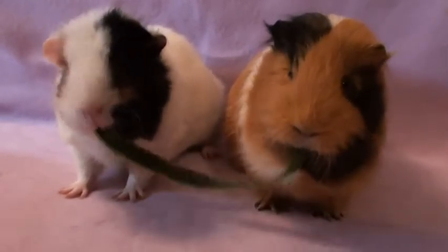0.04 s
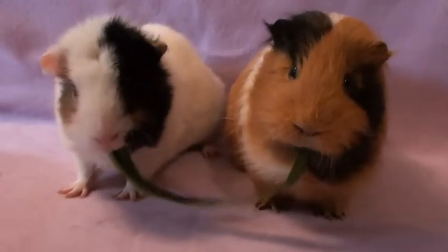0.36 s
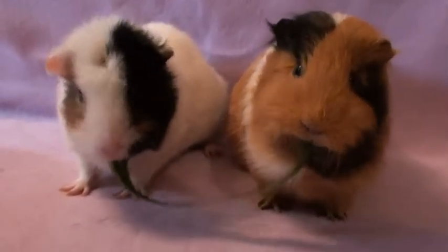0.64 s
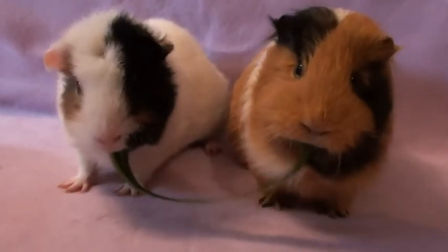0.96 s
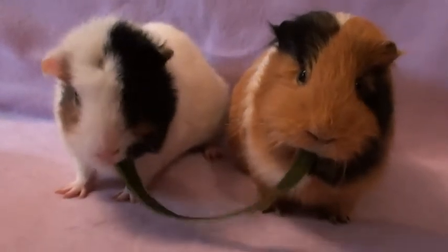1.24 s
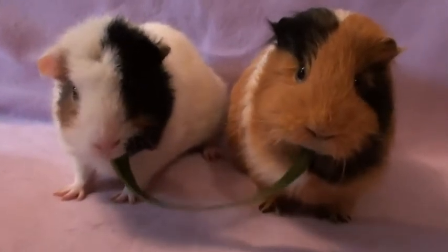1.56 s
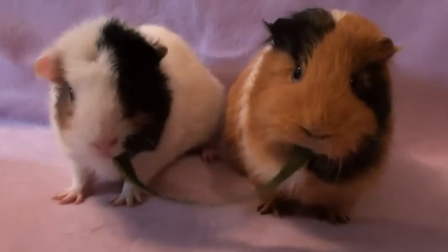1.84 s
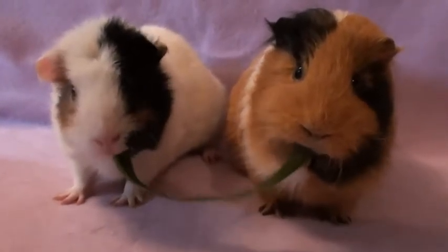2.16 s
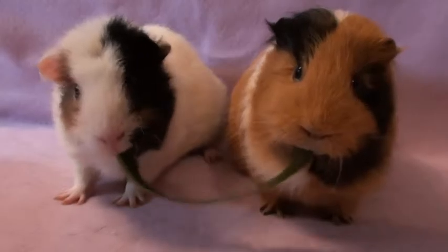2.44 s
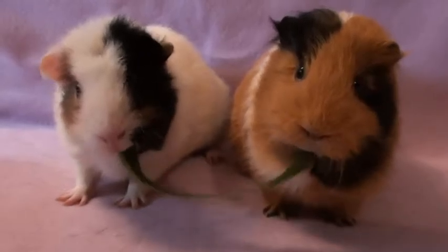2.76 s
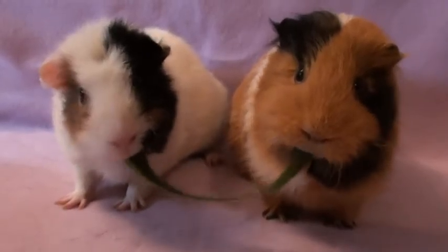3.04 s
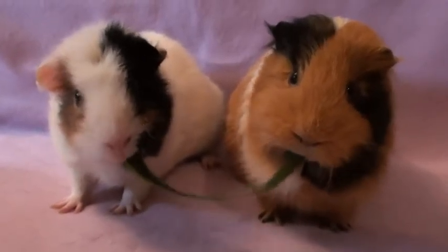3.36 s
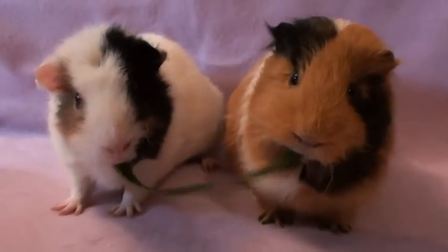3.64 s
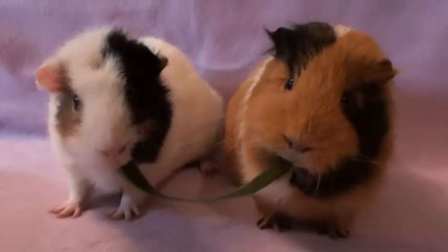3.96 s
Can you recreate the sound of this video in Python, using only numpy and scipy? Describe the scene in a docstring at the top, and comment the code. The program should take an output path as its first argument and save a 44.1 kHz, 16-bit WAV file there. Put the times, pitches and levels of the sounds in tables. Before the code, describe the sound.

Crisp, quick munching of guinea pigs eating a strip of peel, over soft room hiss.

```python
"""Two guinea pigs chew the ends of one strip of peel, close to the microphone in a quiet room.
Soft room noise and hiss lie underneath from the start. Teeth click, then a jaw closes about six
times a second: plant fibres burst in a short crackle of tiny snaps, and the molars slide over the
pulp and ring the mouth. Now and then a jaw thumps softly. Near the end the teeth click twice more."""
import sys
import numpy as np
from scipy import signal
from scipy.fft import rfft, irfft
from scipy.io import wavfile

SR = 44100
rng = np.random.default_rng(int(sys.argv[2]) if len(sys.argv) > 2 else 0)


def pcm_store(signal):
    """Save signal as 16-bit PCM."""
    levels = np.round(np.clip(np.atleast_2d(signal), -1, 1) * 32767)
    wavfile.write(sys.argv[1], SR, levels.astype(np.int16).T)


N = 176400

# steady room noise and hiss: frequency_hz, gain_db
ROOM_TONE = [(22, -50), (38, -15), (80, -0.5), (140, -1), (290, 3.5), (450, 0), (700, -2), (1300, -3.5),
             (2200, -6), (4000, -5), (7000, -8), (11000, -10), (16000, -12)]
# its side level against the middle: frequency_hz, gain_db
ROOM_TONE_SIDE = [(25, -17), (50, -20), (110, -11), (200, -8.5), (380, -3), (700, 1), (1300, 0),
                  (2400, -2.5), (4400, -9), (8000, -7.5), (13000, -31)]
# teeth that click together: start_s, peak_db
TOOTH_CLICKS = [(.002, -36.5), (0.2834, -38), (3.413, -41), (3.4244, -28.5)]
# modes of the teeth: pitch_hz, level_db, t60_s
TOOTH_MODES = [(2693, -2.5, 0.017), (3220, -13, 0.01), (3800, -5.5, 0.013), (4120, -2, 0.0078),
               (5330, 0, 0.011)]
# bites, each a burst of breaking fibres: centre_s, half_length_s, level_db, pitch_hz
BITES = [(0.012, 0.025, -49.5, 9200), (0.048, 0.036, -42, 10000), (0.182, 0.099, -61, 9540),
         (0.306, 0.07, -57.5, 9100), (0.387, 0.056, -47.5, 10300), (0.477, 0.026, -53, 9500),
         (0.551, 0.039, -42.5, 9900), (0.654, 0.064, -54, 9700), (0.728, 0.036, -48, 9300),
         (0.761, 0.032, -45.5, 9700), (0.894, 0.041, -46, 10000), (0.968, 0.076, -60.5, 9500),
         (1.064, 0.051, -46, 10040), (1.135, 0.038, -56.5, 8750), (1.254, 0.027, -42.5, 9500),
         (1.279, 0.016, -47, 8950), (1.413, 0.025, -54, 8300), (1.463, 0.049, -52, 8500),
         (1.583, 0.037, -45.5, 9000), (1.767, 0.039, -46, 9800), (1.902, 0.035, -43, 9350),
         (2.078, 0.042, -47, 11200), (2.104, 0.015, -43.5, 9200), (2.237, 0.04, -47, 9800),
         (2.401, 0.029, -51, 9900), (2.426, 0.024, -46, 10400), (2.559, 0.03, -51.5, 10900),
         (2.596, 0.029, -46, 9800), (2.716, 0.05, -53, 9800), (2.775, 0.05, -51, 9500),
         (2.871, 0.059, -56.5, 9900), (2.93, 0.032, -41, 9600), (3.02, 0.075, -59.5, 9050),
         (3.1, 0.03, -53.5, 9600), (3.14, 0.02, -51.5, 8000), (3.219, 0.029, -55.5, 10600),
         (3.267, 0.017, -44.5, 9400), (3.29, 0.016, -50, 10100), (3.365, 0.04, -57, 9900),
         (3.435, 0.056, -50.5, 10300), (3.585, 0.035, -39.5, 9900), (3.745, 0.12, -54.5, 9600),
         (3.81, 0.019, -50.5, 10200), (3.939, 0.026, -40, 10300)]
# single tough fibres that snap: start_s, level_db, pitch_hz
TOUGH_FIBRES = [(.007, -22.5, 9100), (0.014, -25, 8950), (0.0462, -21.5, 8700), (.198, -30.5, 13000),
                (.3415, -24.5, 8300), (0.385, -31, 9000), (0.5411, -22.5, 7940), (0.558, -29, 9400),
                (0.638, -33, 9300), (.697, -34, 7700), (.712, -27, 10000), (0.755, -24.5, 9500),
                (0.883, -29, 8850), (1.0725, -27, 10100), (1.1479, -21, 8400), (1.1529, -27, 8250),
                (1.245, -21.5, 9900), (1.2585, -24, 9500), (1.3905, -27, 8950), (1.569, -22, 10100),
                (1.581, -23, 9500), (1.7625, -21.5, 11400), (1.895, -21, 9300), (2.109, -40, 9600),
                (2.2423, -24.5, 8900), (2.393, -24.5, 9300), (2.531, -23.5, 9800), (2.591, -20, 11000),
                (2.756, -22.5, 9600), (2.777, -27.5, 10100), (2.923, -33, 9900), (2.9298, -18, 10700),
                (3.088, -34, 10000), (3.1858, -36.5, 5100), (3.257, -25, 10800), (3.2882, -22.5, 9400),
                (3.5723, -22, 9500), (3.586, -22, 10400), (3.595, -17, 10500), (3.85, -29, 9800),
                (3.933, -24, 9600)]
# colour that the mouth gives to every snap: frequency_hz, gain_db
SNAP_COLOUR = [(200, 7.5), (2000, 7.5), (4000, 6), (6500, 4), (8000, -2.5), (9700, 0.5), (11200, 1),
               (13200, -4), (16000, -2.5)]
# close reflections from the peel and the ground: delay_s, gain_db
REFLECTIONS = [(.00043, -22), (.0011, -18)]
# soft, low thumps of the jaw: start_s, level_db, pitch_hz
JAW_THUMPS = [(.012, -50.5, 514), (0.075, -49.5, 445), (.61, -56, 620), (2.263, -54, 315),
              (2.416, -52, 295), (3.253, -49, 257), (3.283, -49.5, 256), (3.817, -52.5, 269)]
# grinding strokes of the molars: centre_s, jaw_db, mouth_db, rasp_db
MOLAR_STROKES = [(0.018, -59, -64, -54.5), (0.162, -62.5, -60.5, -54), (0.318, -62, -59.5, -65),
                 (0.371, -71, -67, -56), (0.446, -66, -65, -61), (0.492, -66, -57.5, -63),
                 (0.56, -65, -66, -59.5), (0.76, -80, -73, -66), (0.823, -58.5, -55.5, -56),
                 (0.902, -62, -68, -57.5), (0.968, -60.5, -57, -56.5), (1.087, -60.5, -63.5, -67),
                 (1.275, -65.5, -66, -63), (1.335, -71, -73, -58), (1.412, -68, -79, -58.5),
                 (1.437, -77, -62, -60.5), (1.471, -64.5, -56.5, -56), (1.571, -71, -62, -61),
                 (1.623, -61.5, -60, -59.5), (1.754, -68, -63, -59), (1.799, -62, -56.5, -56.5),
                 (1.9, -75, -70, -67), (1.948, -63.5, -59.5, -62), (2.062, -82, -68, -55),
                 (2.104, -60.5, -59, -55), (2.264, -64, -64, -60), (2.418, -59.5, -59.5, -53.5),
                 (2.557, -66, -61, -62), (2.692, -67, -72, -61.5), (2.725, -59.5, -54.5, -55.5),
                 (2.775, -77, -68, -58), (2.887, -60.5, -65.5, -59), (3.046, -60, -60, -58.5),
                 (3.105, -88, -70, -55.5), (3.227, -58.5, -60.5, -58.5), (3.275, -80, -70, -59.5),
                 (3.375, -61, -57, -57), (3.445, -60.5, -64, -57), (3.591, -61, -64, -52),
                 (3.736, -60, -59.5, -53.5), (3.799, -68, -68, -57.5), (3.89, -61.5, -66, -58.5),
                 (3.99, -68, -64.5, -64)]
# thud of the jaw in a stroke: frequency_hz, gain_db
JAW_THUD = [(40, -35.5), (130, -22), (220, -6), (298, 2.5), (370, -5), (470, -0.5), (640, -28), (1000, -18),
            (2500, -57.5)]
# ring of the mouth in a stroke: frequency_hz, gain_db
MOUTH_RING = [(300, -21), (700, -15), (1000, -9), (1150, -2.5), (1280, 0.5), (1460, -9.5), (1850, -11),
              (2500, -34), (6000, -18)]
# rasp of the molars in a stroke: frequency_hz, gain_db
MOLAR_RASP = [(800, -25), (2100, -7), (3100, 6), (4400, 7), (5400, 3), (7500, -7.5), (10000, -3.5),
              (16000, -26)]
# the room's answer to the chewing: frequency_hz, gain_db
REVERB_COLOUR = [(30, -45), (120, -19), (350, -12.5), (700, -10), (1300, -29), (2500, -8), (5000, -17),
                 (9000, -24), (16000, -32)]

SNAP_RISE_S, TOP_HZ = .00014, 15900
FIBRE_SPREAD = dict(pitch_spread=.115, spread_db=3.6)
CELL_SPREAD = dict(pitch_spread=.25, spread_db=4)


def undb(db):
    """Decibels to gain."""
    return 10 ** (np.asarray(db) / 20)


def unit(x):
    """Scale to rms 1."""
    return x / np.sqrt(np.mean(x ** 2) + 1e-20)


def colour(x, points):
    """Causal filter whose gain follows (frequency_hz, gain_db) points."""
    hz, db = np.array(points, float).T
    n = 2 * N
    bin_hz = np.arange(N + 1) * SR / n
    gain_db = np.interp(np.log(bin_hz + 1), np.log(hz), db)
    cepstrum = irfft(np.log(undb(gain_db)))
    cepstrum[1:N] *= 2  # fold to minimum phase
    cepstrum[N + 1:] = 0
    return irfft(rfft(x, n) * np.exp(rfft(cepstrum)))[..., :x.shape[-1]]


def add(out, start_s, sound):
    """Mix a sound in at a time."""
    i = int(start_s * SR)
    sound, i = sound[max(0, -i):], max(0, i)
    out[i:i + len(sound)] += sound[:max(0, N - i)]


def ring(t, hz, rise_s, phase=0):
    """A few cycles that swell and die at once."""
    envelope = np.square(t / rise_s * np.exp(1 - t / rise_s))
    return envelope * np.sin(2 * np.pi * (np.minimum(hz, TOP_HZ) * t + phase))


def flutter(hz, depth_db, size=N):
    """A gain that wavers quickly at random."""
    steps = rng.standard_normal(N // 100)
    return undb(depth_db * np.interp(np.arange(size) / SR * hz, np.arange(len(steps)), steps))


def room_tone(mid_db=-57.5):
    """Steady room noise and hiss; the middle range is widest between left and right."""
    mid, side = (unit(colour(rng.standard_normal(N), ROOM_TONE)) for _ in range(2))
    return undb(mid_db) * (mid + colour(side, ROOM_TONE_SIDE) * np.array([[1], [-1]]))


def tooth_clicks():
    """Teeth meet and ring for a moment."""
    t, out = np.arange(SR // 20) / SR, np.zeros(N)
    click = sum(undb(db) * np.sin(2 * np.pi * (hz * t + rng.random())) * np.exp(-np.log(1000) * t / t60)
                for hz, db, t60 in TOOTH_MODES)
    for start_s, peak_db in TOOTH_CLICKS:
        add(out, start_s, undb(peak_db) * click / np.abs(click).max())
    return out


def crackle(length_s, per_s, hz, pitch_spread, spread_db, max_snaps=600):
    """Fibres or cells give way one after another, each with its own strength and pitch."""
    slot = np.arange(min(max_snaps, int(length_s * per_s)))[:, None]
    late, phase, chance = rng.random((3, max_snaps))[:, slot]
    strength = undb(spread_db * np.sqrt(12) * (chance - .5))  # bounded: none is far above the rest
    detune = np.clip(rng.standard_normal(max_snaps), -2, 2)[slot]
    samples = np.arange(56)
    snaps = strength * ring(samples / SR, hz * np.exp(pitch_spread * detune), SNAP_RISE_S, phase)
    onsets = ((slot + late) / per_s * SR).astype(int)
    return np.bincount((onsets + samples).ravel(), snaps.ravel())


def jaw_press(burst, width):
    """A burst swells and fades in clumps as the jaw closes; every burst has the same rms."""
    clumps = flutter(hz=85, depth_db=4, size=len(burst))
    bell = np.exp(-.5 * (np.linspace(-1, 1, len(burst)) / width) ** 2)
    return unit(burst * clumps * bell) / np.sqrt(2)


def with_reflections(direct):
    """Echoes off the peel and the ground reach the microphone just behind the direct sound."""
    out = direct.copy()
    for delay_s, db in REFLECTIONS:
        add(out, delay_s, undb(db) * direct)
    return out


def biting():
    """Each bite crackles and fizzes; tough fibres snap singly, and faint wet ticks fill the pauses."""
    out = np.zeros(N)
    for centre_s, half_s, db, hz in BITES:
        fibres = crackle(2 * half_s, per_s=460, hz=hz, **FIBRE_SPREAD)
        juicy_cells = crackle(2 * half_s, per_s=1700, hz=hz, **CELL_SPREAD)
        add(out, centre_s - half_s, undb(db - 2) * jaw_press(fibres, width=.32))
        add(out, centre_s - half_s, undb(db - 6.5) * jaw_press(juicy_cells, width=.42))
    for start_s, db, hz in TOUGH_FIBRES:
        add(out, start_s, undb(db - 1.5) * ring(np.arange(SR // 1000) / SR, hz, SNAP_RISE_S))
    usual_hz = np.mean([bite[-1] for bite in BITES])
    wet_ticks = crackle(N / SR, per_s=130, hz=usual_hz, **CELL_SPREAD)
    add(out, 0, undb(-72) * unit(wet_ticks))
    return with_reflections(colour(out, SNAP_COLOUR))


def jaw_thumps():
    """The jaw gives a soft, low thump that dies within a few cycles."""
    out = np.zeros(N)
    for start_s, db, hz in JAW_THUMPS:
        add(out, start_s, undb(db) * ring(np.arange(SR // 20) / SR, hz, rise_s=.0042))
    return out


def swell(centre_s, rise_s, fall_s):
    """Bell-shaped envelope of one stroke, with its own rise and fall times."""
    t = np.arange(N) / SR - centre_s
    distance = t / np.where(t < 0, rise_s, fall_s)
    return np.exp(-.5 * distance ** 2) * (np.abs(distance) < 4)


def slips(centres_s, levels_db, resonance, rise_s=.014, fall_s=.0097, per_s=2200, spread_db=3.5):
    """Dense, uneven slips of the molars excite a resonance and swell with every stroke."""
    effort = sum(undb(db) * swell(at, rise_s, fall_s) for at, db in zip(centres_s, levels_db))
    slipping = rng.random(N) < per_s / SR
    strength = undb(spread_db * np.clip(rng.standard_normal(N), -2, 2))
    impulses = slipping * strength * rng.choice([-1, 1], N)
    return effort * unit(colour(impulses, resonance))


def grinding():
    """Molars stick and slip over the pulp: a thud of the jaw, a ring of the mouth and a rasp."""
    centres_s, jaw_db, mouth_db, rasp_db = np.array(MOLAR_STROKES).T
    thud = slips(centres_s, jaw_db + 3, JAW_THUD)
    mouth = slips(centres_s, mouth_db + 4.5, MOUTH_RING)
    rasp = slips(centres_s, rasp_db, MOLAR_RASP, rise_s=.024, fall_s=.01)
    rasp *= flutter(hz=117, depth_db=4)  # the molars catch and let go
    lean_right = undb([[-2.25], [2.25]])
    return thud * lean_right + mouth + rasp


def reverberation(source, t60_s=.3):
    """The room answers with a short dull tail, different left and right."""
    t = np.arange(SR // 2) / SR
    tail = rng.standard_normal((2, len(t))) * np.exp(-np.log(1000) * t / t60_s)
    tail /= np.sqrt(np.sum(tail ** 2, axis=1, keepdims=True))
    return signal.fftconvolve(colour(source, REVERB_COLOUR)[None], tail, axes=1)[:, :N]


def scene():
    """Both animals sit side by side, close up and straight ahead of the microphone."""
    chewing = biting() + tooth_clicks() + grinding() + jaw_thumps()
    return chewing + reverberation(chewing.mean(axis=0)) + room_tone()


def record(dry):
    """The recorder cuts the top of the treble."""
    return signal.sosfilt(signal.ellip(12, .1, 80, TOP_HZ, fs=SR, output="sos"), dry)


dry = scene()
out = record(dry)
pcm_store(out)
```